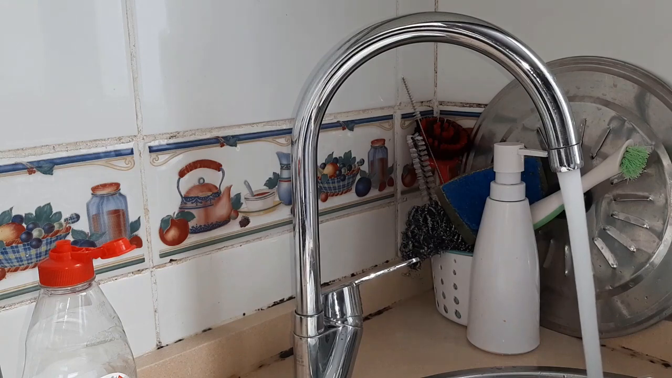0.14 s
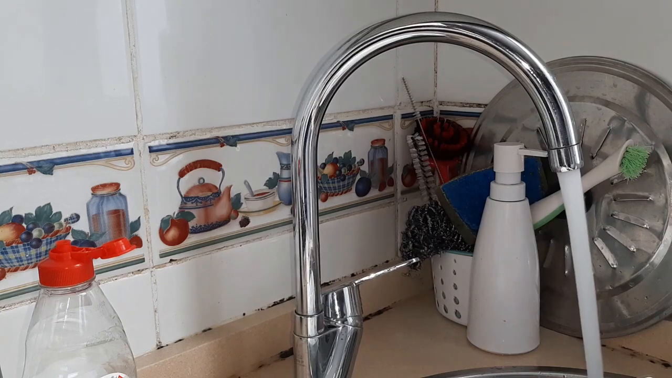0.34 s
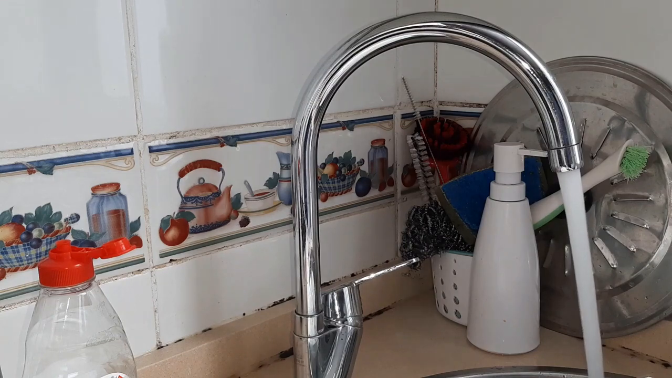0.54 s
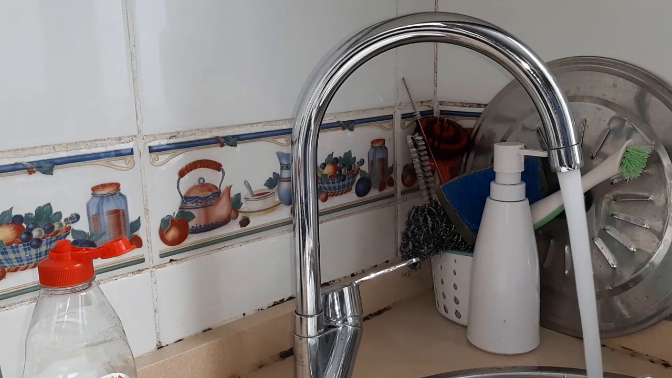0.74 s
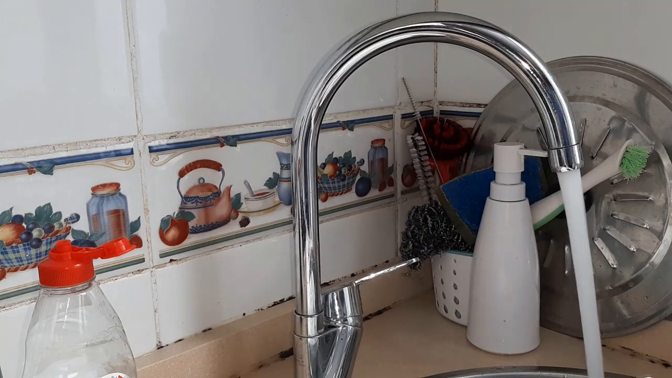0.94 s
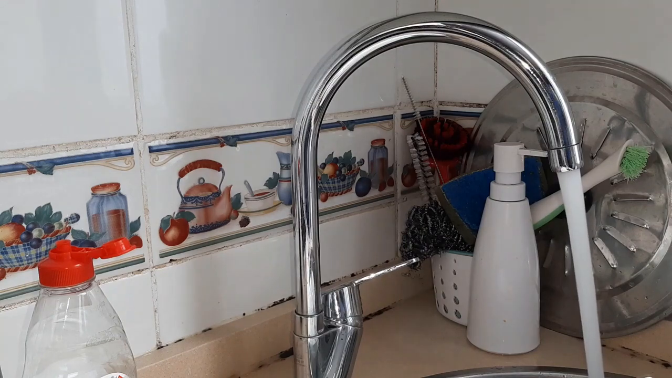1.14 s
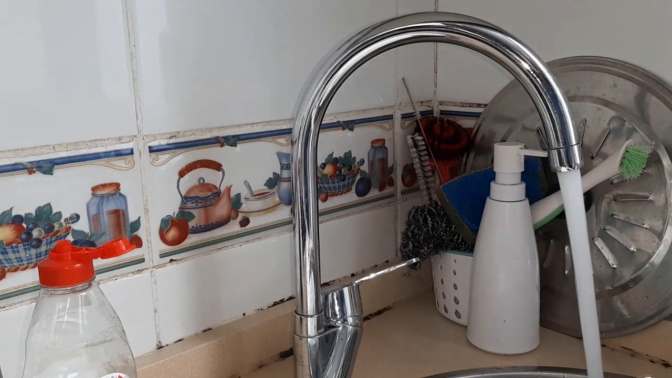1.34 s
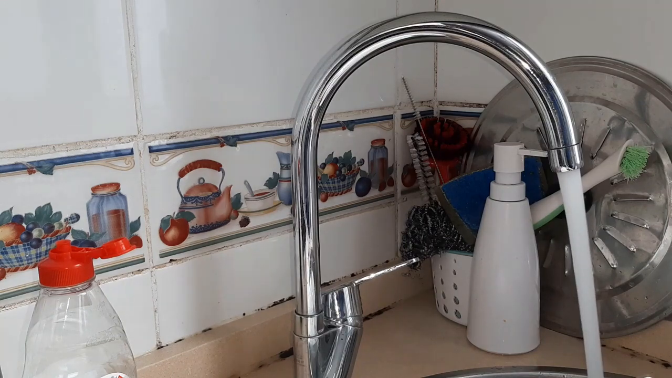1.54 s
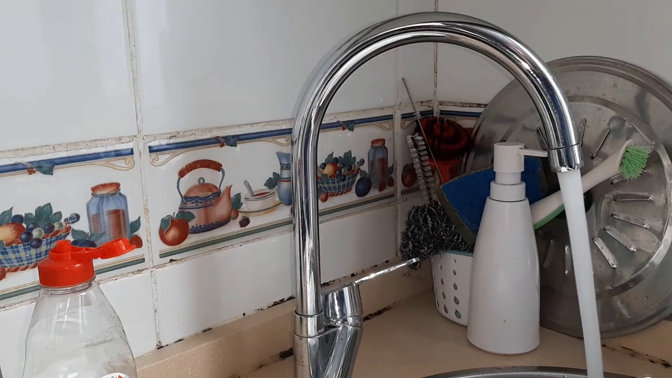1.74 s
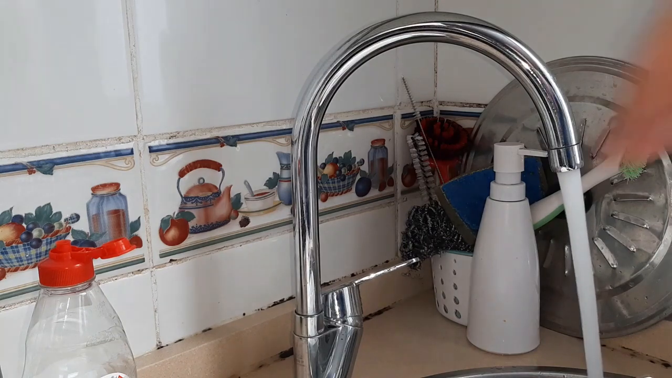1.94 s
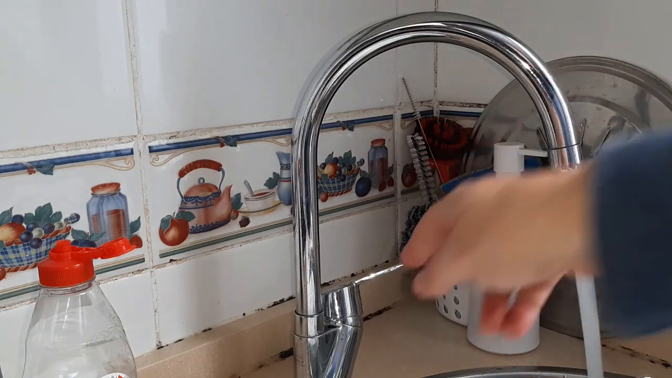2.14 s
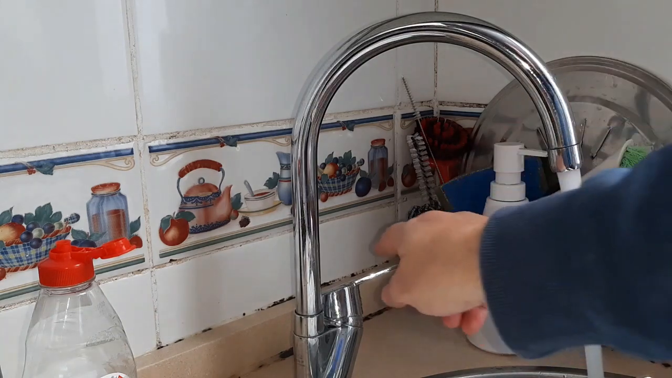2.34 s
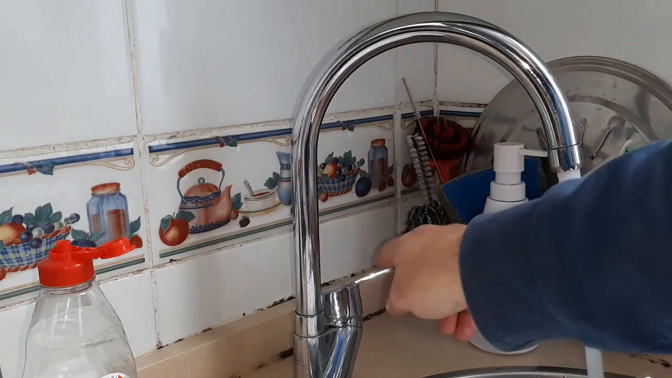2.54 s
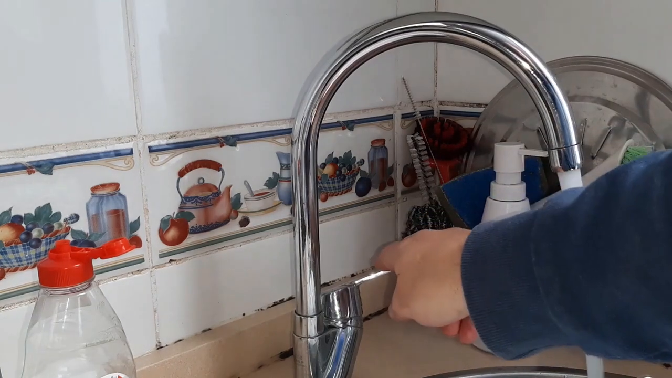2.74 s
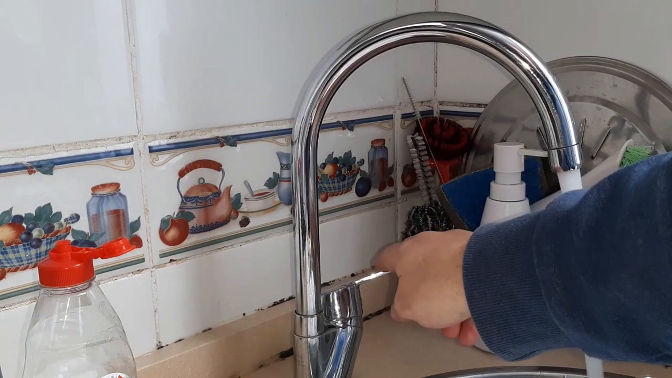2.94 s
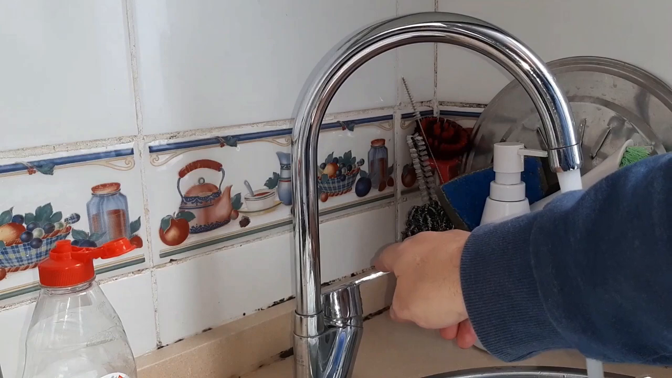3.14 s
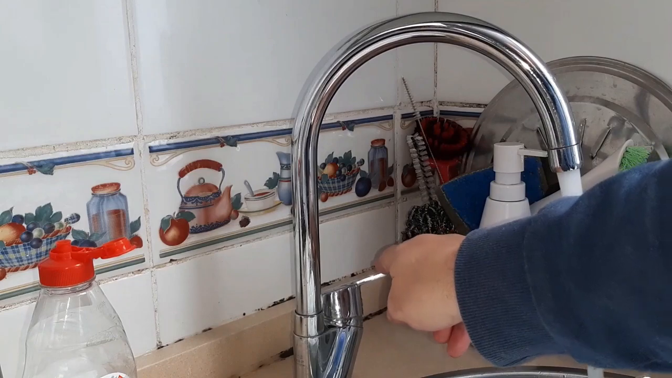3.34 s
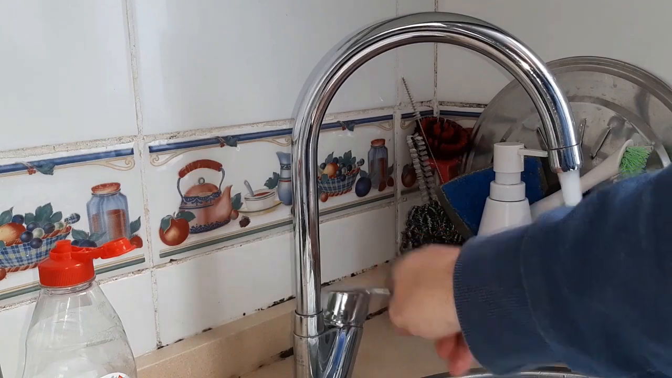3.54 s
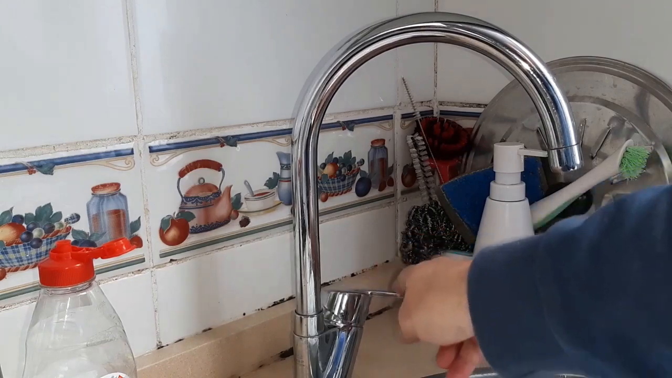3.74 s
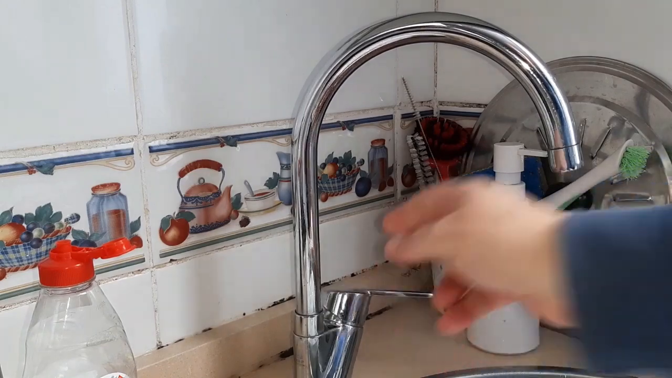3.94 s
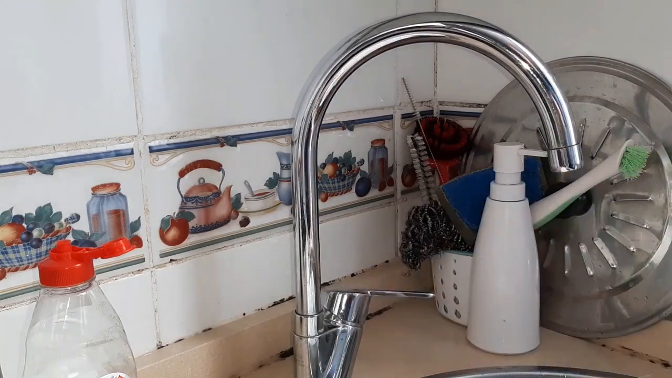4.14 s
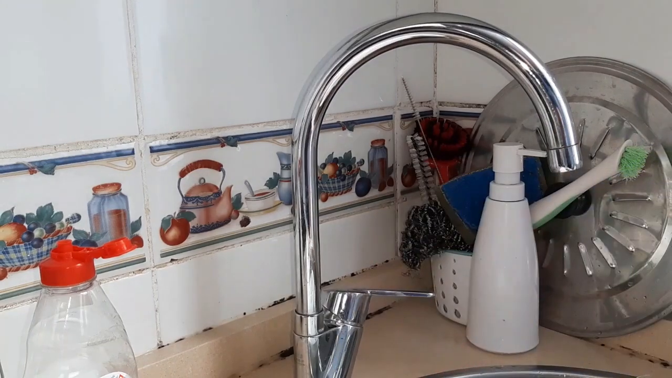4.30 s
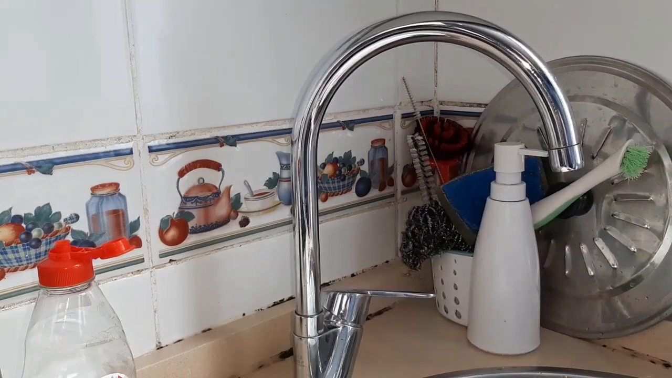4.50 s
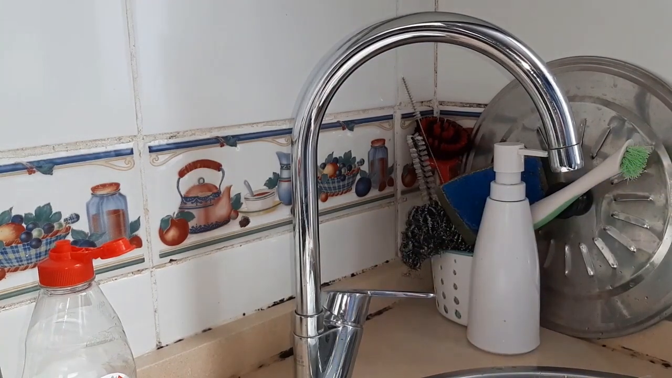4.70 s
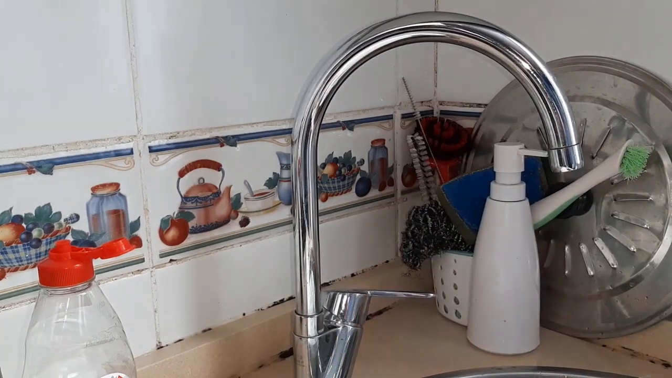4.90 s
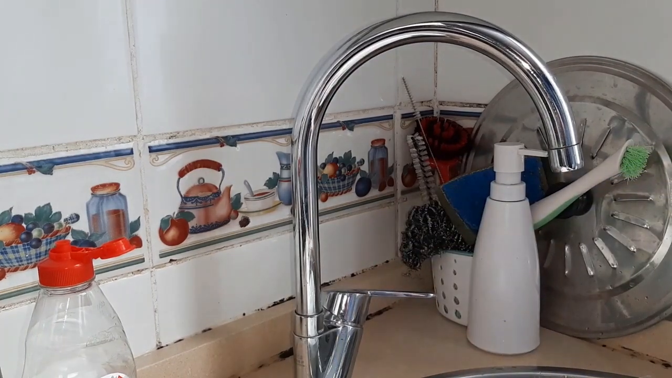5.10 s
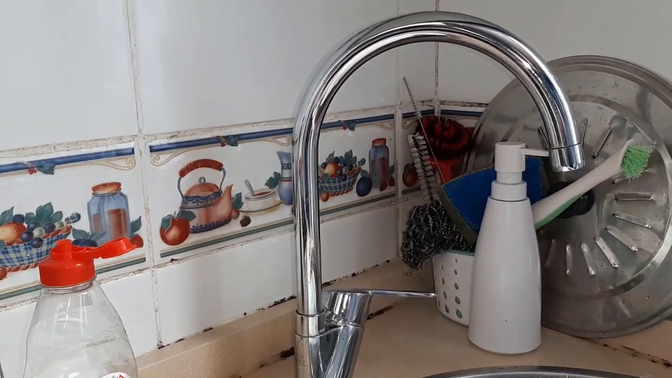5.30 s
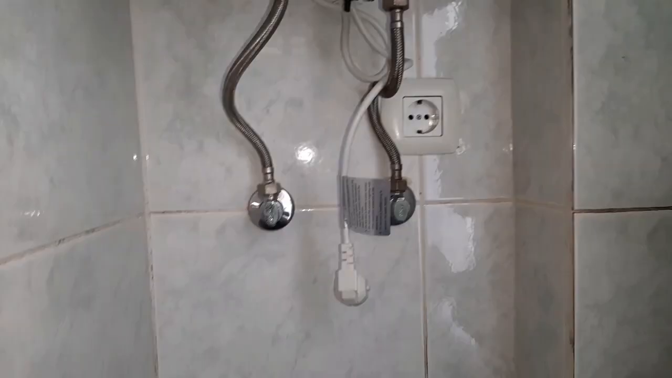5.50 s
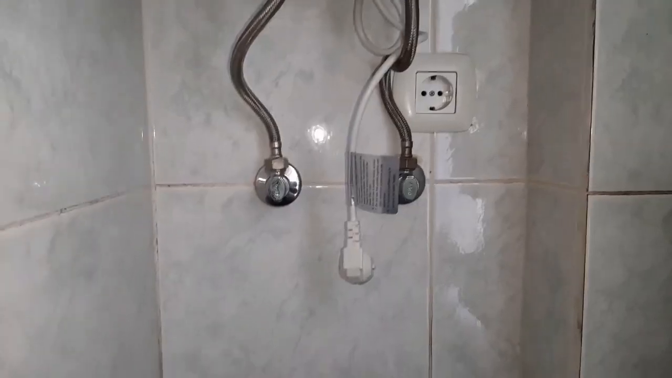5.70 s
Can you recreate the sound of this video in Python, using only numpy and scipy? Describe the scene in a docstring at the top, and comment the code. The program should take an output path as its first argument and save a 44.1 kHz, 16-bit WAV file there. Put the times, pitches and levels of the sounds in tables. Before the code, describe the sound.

A kitchen tap splashes and drums hard into a steel sink, shuts off with a dull thud, then the drain fizzes, gurgles and drips before a cut to near silence.

```python
"""Water from a kitchen tap drums on a steel sink and sprays, then the lever shuts it with a thud.
The spout empties and the drain fizzes, gurgles, drips and sings over a mains hum, with soft knocks.
The sound cuts to a short silence, then a quieter room fades in. Random impacts excite ringing modes of steel
and cabinet; spray, foam and air are coloured noise; drops and bubbles are short notes rising in pitch."""
import sys
import numpy as np
from scipy import signal
from scipy.fft import rfft, irfft
from scipy.io import wavfile
from scipy.ndimage import uniform_filter1d

SR = 44100
rng = np.random.default_rng(int(sys.argv[2]) if len(sys.argv) > 2 else 0)


def generate_wav(signal):
    """Clip the signal to [-1, 1] and save it as 16-bit WAV at the path in sys.argv[1]."""
    frames = np.transpose(np.atleast_2d(signal))
    scaled = np.clip(frames, -1, 1) * 32767
    pcm = np.round(scaled).astype(np.int16)
    wavfile.write(sys.argv[1], SR, pcm)


def boost(x):
    """Linear amplitude factor 10**(x/20) for a level x in decibels (scalar or array-like)."""
    u = np.asarray(x, float) / 20
    return 10 ** u


N = 254016
t = np.arange(N) / SR  # seconds

# Ringing modes of the steel basin. Each row: pitch in Hz, relative level in dB, t60 in seconds.
BASIN_MODES = [(344.7, -15, 0.06), (401.5, -8, 0.087), (438, -10, 0.051), (468, -3.5, 0.056),
               (526, -2.5, 0.075), (562, -3, 0.034), (664, -12, 0.03), (761, -7, 0.047), (820, -7.5, 0.033),
               (955, -17.5, 0.078), (1013, -9, 0.075), (1128, -12.5, 0.056), (1341, -12.5, 0.066),
               (1512, -11, 0.089), (1683, -11, 0.075), (1973, -9.5, 0.11), (2080, -12, 0.033),
               (2405, -8, 0.074)]
# Ringing modes of the cabinet. Each row: pitch in Hz, relative level in dB, t60 in seconds.
CABINET_MODES = [(75.4, -5.5, 0.26), (100.5, -2.5, 0.18), (130, -6.5, 0.052), (173.5, -7, 0.083),
                 (243.4, -8, 0.048), (301, -11, 0.14)]
# Heavy slugs of water that trap a pocket of air on the steel.
# Each row: start in seconds, level in dB, pitch in Hz, splash against the plop in dB.
SLUG_HITS = [(0.009, -30, 490, -24), (0.057, -26.5, 525, -0.5), (0.137, -35, 534, 6),
             (0.203, -23.5, 560, -7), (0.224, -27, 825, -13), (0.291, -26.5, 484, -20),
             (0.321, -29, 565, -4), (0.439, -34, 763, -2.5), (0.484, -29.5, 517, -2),
             (0.648, -34, 536, -14), (0.689, -35, 530, -13), (0.72, -25.5, 519, -16),
             (0.794, -27.5, 747, -15), (0.85, -30, 462, -13), (0.888, -35, 468, -1.5),
             (0.959, -26.5, 516, -11), (0.979, -33, 468, -12), (1.009, -30, 570, -13), (1.049, -35, 452, 0),
             (1.078, -29.5, 484, 0), (1.144, -29.5, 803, -7), (1.196, -33.5, 468, -1),
             (1.269, -31.5, 517, -11), (1.329, -26, 533, -14.5), (1.378, -32, 480, -13),
             (1.442, -36, 535, -7), (1.472, -29, 547, -0.5), (1.532, -29, 585, -18), (1.567, -26, 525, -8),
             (1.599, -32, 540, -2), (1.667, -28, 455, 1), (1.741, -29.5, 759, -4.5),
             (1.78, -28.5, 585, -9.5), (1.869, -35, 533, -12.5), (1.962, -28, 538, -8),
             (2.039, -36, 526, -6), (2.09, -26.5, 525, -2), (2.116, -41, 534, -6), (2.213, -32.5, 565, 2.5),
             (2.335, -43, 495, -1.5), (2.393, -29, 535, -10.5), (2.431, -25.5, 545, -9.5),
             (2.47, -29, 535, -14), (2.539, -30.5, 547, -21), (2.633, -32.5, 540, -7),
             (2.689, -27.5, 505, -8.5), (2.753, -24, 504, -17), (2.83, -29.5, 536, -5.5),
             (2.895, -29, 532, -3.5), (2.975, -27, 514, -13), (3.032, -30, 540, -4), (3.072, -33, 755, -2),
             (3.102, -28.5, 759, -7), (3.124, -25.5, 577, -17), (3.234, -25, 813, -9),
             (3.311, -23, 538, -25), (3.483, -32, 522, -23), (3.523, -22.5, 507, -14),
             (3.539, -26.5, 522, -13), (3.55, -28, 486, -17), (3.576, -33.5, 537, -15),
             (3.63, -23, 522, -10.5), (3.694, -23.5, 528, -3.5), (3.714, -26.5, 493, -7),
             (3.734, -30, 496, -11.5)]
# The jet swells for a moment and drums harder. Each row: crest in seconds, force in dB.
JET_SURGES = [(0.0, -37.5), (0.7, -55), (0.97, -46), (1.58, -42.5), (2.0, -37.5), (2.68, -42), (3.1, -41),
              (3.545, -38), (3.72, -40.5)]
# Colour of the spray. Each row: frequency in Hz, relative level in dB per Hz.
SPRAY_COLOUR = [(350, -2.5), (600, -4.5), (800, -0.5), (1170, -7.5), (1500, -3.5), (2800, -4), (5500, -3.5),
                (8900, -7.5), (12500, -3.5), (14500, -0.5), (17000, -2)]
# Echoes off the basin walls cancel the spray in places.
# Each row: centre in Hz, width in Hz, share removed (0 to 1).
ECHO_GAPS = [(1847, 82, 0.94), (3110, 330, 0.19), (4630, 830, 0.26), (6220, 170, 0.65), (9040, 1300, 0.31)]
# Last spurts from the spout. Each row: crest in seconds, level in dB.
SPOUT_SPURTS = [(3.68, -30), (3.712, -32), (3.8, -38.5), (3.895, -60)]
# Mains hum. Each row: pitch in Hz, level in dB rms midway between the sides.
MAINS_HUM = [(50, -72.5), (100.3, -58), (150, -81)]
# Colour of the kitchen's rumble and air. Each row: frequency in Hz, relative level in dB per Hz.
KITCHEN_COLOUR = [(15, -38), (28, -6), (50, -10), (100, -11), (130, -17), (185, -27), (285, -14),
                  (600, -46), (900, -39.5), (1350, -25.5), (2100, -31), (2900, -46.5), (8000, -30.5),
                  (16500, -63)]
# The lever stops the water column. Each row: start in seconds, peak in dB.
VALVE_THUD = [(3.614, -26.5)]
# Colour of the fizzing foam. Each row: frequency in Hz, relative level in dB per Hz.
FIZZ_COLOUR = [(1060, -72), (1800, -5), (2980, -7), (3540, -4), (5540, -2.5), (8910, -9.5), (12800, -3.5),
               (16000, -5)]
# Colour of the gurgling trap. Each row: frequency in Hz, relative level in dB per Hz.
GURGLE_COLOUR = [(200, -10), (350, -5.5), (700, -2), (1400, -2.5), (2100, -4.5), (3200, -6.5)]
# The trap gulps air and stirs the foam, before the drain's fade-in.
# Each row: crest in seconds, gurgle in dB, fizz in dB, build-up in seconds.
TRAP_GULPS = [(3.822, -37, -37, 0.012), (3.931, -55, -72, 0.023), (4.185, -52.5, -70, 0.0047),
              (4.225, -55, -55.5, .01), (4.39, -53, -52, 0.023), (4.415, -51, -61, .015),
              (4.435, -49.5, -53, 0.02), (4.455, -59, -57.5, .01), (4.49, -58, -62, .01),
              (4.545, -62, -70, .01), (4.655, -61, -64, .004), (4.71, -56, -62.5, 0.025),
              (4.895, -66, -62, .004), (5.064, -88, -58.5, 0.14), (5.346, -61, -65, 0.0065),
              (5.428, -82, -61, .01)]
# Drips and small splashes. Each row: start in seconds, peak in dB, pitch in Hz, left minus right in dB.
DRIP_HITS = [(3.8008, -41, 6800, 2), (3.8935, -35, 4000, 6), (3.8932, -38, 7000, 6), (4.057, -41, 3010, 2),
             (4.181, -51, 1100, 2), (4.2043, -45, 9140, 3), (4.356, -41, 2700, -3), (4.366, -43, 2500, -3),
             (4.3713, -36, 4140, -8), (4.376, -45, 5900, -6), (4.417, -50, 1500, 0), (4.432, -46, 950, 0),
             (4.4894, -45, 2190, -1.5), (4.645, -38, 3250, 5), (4.647, -42, 4900, 5), (4.65, -45, 2350, -1),
             (4.8915, -50, 4600, 0), (4.8965, -47, 2700, -1), (5.035, -42, 4020, 6), (5.05, -48, 3750, 6),
             (5.0968, -49, 6850, 8), (5.1194, -46, 3930, 1), (5.14, -51, 3800, 1), (5.3414, -50, 7620, -14),
             (5.42, -50, 4670, -5)]
# Soft knocks on something hollow.
# Each row: start in seconds, peak in dB, pitch in Hz, t60 in seconds, left minus right in dB.
KNOCK_HITS = [(4.18, -49, 382, .09, 2), (4.199, -56, 480, .08, 2), (4.208, -55, 150, .25, 2),
              (4.222, -60, 330, .1, 2), (4.252, -61, 300, .1, 2), (5.3412, -37, 262, .013, -26),
              (5.3487, -40, 280, .025, -26), (5.362, -56, 140, .15, -26), (5.365, -68, 420, .08, -26)]
# The last trickle singing in the waste pipe. Each row: crest in seconds, level in dB.
PIPE_TRICKLES = [(4.955, -57), (4.97, -59), (4.995, -62), (5.02, -59), (5.036, -58), (5.053, -61),
                 (5.07, -57), (5.085, -58), (5.103, -63), (5.183, -62), (5.195, -64)]
# A faint thin note that lingers. Each row: crest in seconds, level in dB.
FAINT_NOTES = [(5.325, -78), (5.37, -75), (5.45, -76)]
# Colour of the next room's air. Each row: frequency in Hz, relative level in dB per Hz.
NEXT_AIR_COLOUR = [(24, -51.5), (40, -14), (256, -22), (320, -12), (529, -13.5), (663, -24), (1180, -22),
                   (1300, -13.5), (1520, -24), (4340, -22.5), (16000, -39)]

EMPTY_S = 3.751  # the spout runs empty


def level(x, db):
    """Set the rms level in dB."""
    return x * boost(db) / np.sqrt(np.mean(x ** 2))


def after(s):
    """Seconds since a moment, zero before it."""
    return np.maximum(t - s, 0)


def walk(rate):
    """Random levels held 1 / rate s and slewed twice; spread near 1."""
    hold = int(SR / rate)
    steps = np.repeat(rng.standard_normal(N // hold + 1), hold)
    return 1.644 * uniform_filter1d(uniform_filter1d(steps, hold), hold)[:N]


def swell(events, rise_s, fall_s):
    """Gain that climbs to each (s, dB) and dies away exponentially after it; powers add."""
    rises = np.broadcast_to(rise_s, len(events))
    power = 0
    for (s, db), rise in zip(events, rises):
        time_constants = np.where(t < s, (s - t) / rise, (t - s) / fall_s)
        power = power + boost(2 * db) * np.exp(-2 * time_constants)
    return np.sqrt(power)


def droplets(rate, spread_db, channels=2):
    """Sparse clicks of either sign at a mean rate per second, some larger than the rest."""
    hit = rng.random((channels, N)) < rate / SR
    size_db = np.minimum(spread_db * rng.exponential(size=(channels, N)), 9)
    return hit * rng.standard_normal((channels, N)) * boost(size_db)


def hiss(spectrum, source, flicker_db, rate):
    """Colour a source in broad overlapping bands; each band flickers on its own."""
    hz = np.maximum(np.fft.rfftfreq(N, 1 / SR), 1)
    points = np.array(spectrum)
    colour_db = np.interp(np.log(hz), np.log(points[:, 0]), points[:, 1], left=-150)
    coloured = rfft(source) * boost(colour_db)
    band, out = np.log(hz / points[0, 0]), 0
    for k in range(int(np.log(points[-1, 0] / points[0, 0])) + 2):
        share = np.cos(np.pi / 2 * np.clip(band - k, -1, 1)) ** 2
        out = out + irfft(coloured * share, N) * boost(flicker_db * walk(rate))
    return level(out, 0)


def ring(modes, length_s=.4):
    """Impulse response of damped modes; neighbours move against each other."""
    s = np.arange(int(length_s * SR)) / SR
    out = 0
    for k, (hz, db, t60) in enumerate(modes):
        strength = (-1) ** k * boost(db) * np.sqrt(1 / t60)
        out = out + strength * np.sin(2 * np.pi * hz * s) * boost(-60 * s / t60)
    return out


def room(x):
    """Direct sound plus a tiled room's decaying tail, different at each ear."""
    t60_s, tail_db = 0.18, -6.5
    s = np.arange(int(.4 * SR)) / SR
    tail = rng.standard_normal((2, len(s))) * boost(-60 * s / t60_s) * (s > .002)
    tail = tail / np.sqrt(np.sum(tail ** 2, axis=1, keepdims=True))
    stereo = np.atleast_2d(x) * np.ones((2, 1))
    return x + boost(tail_db) * signal.fftconvolve(stereo, tail, axes=1)[:, :N]


def place(events, shape):
    """Put one sound per row at its time, peak and side."""
    out = np.zeros((2, N + SR))
    for s, db, hz, t60, pan_db in events:
        sound = shape(np.arange(int(.25 * SR)) / SR, hz, max(t60, .01))
        gain = boost(db + np.array([[.5], [-.5]]) * pan_db)
        start = int(s * SR)
        out[:, start:start + len(sound)] += sound / np.abs(sound).max() * gain
    return out[:, :N]


def whistle(hz, width_hz):
    """Noise inside one resonance whose centre may move."""
    sway = uniform_filter1d(rng.standard_normal((2, N)), size=int(SR / width_hz))
    phase = 2 * np.pi * np.cumsum(hz * np.ones(N)) / SR
    return level(sway[0] * np.sin(phase) + sway[1] * np.cos(phase), 0)


def basin(force):
    """The jet wanders over the steel, so each mode's share varies; water lying on it bends the pitch."""
    bend, share_wander_db = .008, 1.3  # bend is a share of each mode's pitch
    out = 0
    for k, (hz, db, t60) in enumerate(BASIN_MODES):
        turn = np.exp(2j * np.pi * np.cumsum(hz * (1 + bend * walk(9))) / SR)
        share_db = db + 1.5 * walk(60) + share_wander_db * walk(14)
        share = (-1) ** k * boost(share_db) / np.sqrt(t60)
        decay = boost(-60 / (t60 * SR))
        # a one-pole decay in the mode's turning frame is a resonator of moving pitch
        out = out + np.imag(turn * signal.lfilter([1], [1, -decay], force * share / turn))
    return out


def drumming():
    """Broken water strikes the basin in random beats and sets its steel modes ringing."""
    force_db, wander_db, fall_db_s = -44.5, .6, -170
    steel_db = -40  # sound of the basin per unit of force
    beats = droplets(1500, 3.44, channels=3) * boost(0.8 * walk(90))
    # both sides hear most beats alike, some on one side only
    force = level(uniform_filter1d(beats[:1] + 0.38 * beats[1:], size=12), 0)
    steady = boost(force_db + wander_db * walk(7.27))
    strength = np.hypot(steady, swell(JET_SURGES, .025, .035))  # rise and fall in seconds
    return boost(steel_db) * basin(force * strength * boost(fall_db_s * after(EMPTY_S)))


def slugs():
    """Each slug rings a rough, short air-pocket note and throws a brighter splash."""
    plop_t60_s, plop_rise_s, splash_t60_s = 0.078, 0.002, 0.075
    out, s = np.zeros((2, N)), np.arange(int(.1 * SR)) / SR
    bright = signal.butter(2, [750, 2300], "band", fs=SR, output="sos")
    for when, db, hz, splash_db in SLUG_HITS:
        chance = rng.standard_normal((3, len(s)))
        rough = 1 + 0.32 * uniform_filter1d(chance[0], size=200) * np.sqrt(200)
        plop = rough * np.sin(2 * np.pi * hz * s) * boost(-60 * s / plop_t60_s)
        splash = level(signal.sosfilt(bright, 0.58 * chance[1:] + chance[0]), splash_db)
        splash = splash * boost(-60 * s / splash_t60_s)
        start = int(when * SR)
        out[:, start:start + len(s)] += boost(db) * (plop + splash) * (1 - np.exp(-s / plop_rise_s))
    return out


def cabinet_boom():
    """The jet shakes the cabinet, whose low modes boom a little louder on the left."""
    boom_db, wander_db, fall_db_s = -44.5, 1.3, -100
    shakes = droplets(400, 3.3, channels=3)
    shakes = shakes[:1] + 0.64 * shakes[1:]
    boom = level(signal.fftconvolve(shakes, ring(CABINET_MODES)[None], axes=1)[:, :N], 0)
    boom = boom * boost(boom_db + wander_db * walk(10.12) + fall_db_s * after(EMPTY_S))
    return boom * boost(np.array([[1.5], [-1.5]]))


def bubbles(per_s, low_hz, high_hz, cycles):
    """Trapped air rings for a few cycles, rising in pitch, with random strength left and right."""
    out, when = np.zeros((2, N)), rng.random((2, N))
    pitches = np.geomspace(low_hz, high_hz, num=9)
    s = np.arange(int(.03 * SR)) / SR
    born = np.flatnonzero(when[0] < per_s / SR)
    kind = (when[1, born] * len(pitches)).astype(int)
    for k, hz in enumerate(pitches):
        starts = np.zeros((2, N))
        starts[:, born[kind == k]] = rng.standard_normal((2, np.sum(kind == k)))
        grain = np.sin(2 * np.pi * hz * s * (1 + 0.0191 * hz * s)) * np.exp(-s * hz / cycles)
        out += signal.oaconvolve(starts, grain[None], axes=1)[:, :N]
    return level(out, 0)


def spray():
    """Water scatters as flickering hiss and bubbles; closing the valve leaves a duller dribble and spurts."""
    full_db, bubbles_db = -29, -15.5  # the open jet; bubbles against the hiss
    arm_s, arm_db = 2.08, -1.5  # an arm reaches in and shades the spray
    lever_s, lever_db_s, shut_fall_s = 3.47, -14, 0.0046  # the lever starts to close, then shuts
    spout_db, spout_fall_db_s = -37, -110
    slow_water_hz = 8100  # slow water has less treble
    source = rng.standard_normal((2, N)) + 0.49 * level(droplets(2500, 3.7), 0)
    water = hiss(SPRAY_COLOUR, source * boost(0.1 * walk(12) + 0.5 * walk(60)), 0.52, 15)
    water = water + boost(bubbles_db) * bubbles(400, 902, 7010, 5.5)
    jet_on = boost(full_db + arm_db * (t > arm_s) + lever_db_s * after(lever_s))
    jet_on = jet_on * np.exp(-after(VALVE_THUD[0][0]) / shut_fall_s)
    spout = boost(spout_db + spout_fall_db_s * after(EMPTY_S))
    dribble = np.hypot(spout, swell(SPOUT_SPURTS, .012, .025))  # rise and fall in seconds
    dull = signal.lfilter(*signal.butter(1, slow_water_hz, fs=SR), water)
    water = water * jet_on + dull * dribble * (1 - jet_on / jet_on.max())
    for hz, width_hz, share in ECHO_GAPS:
        water = water - share * signal.lfilter(*signal.iirpeak(hz, hz / width_hz, fs=SR), water)
    return water


def kitchen():
    """Mains hum that wavers in level and phase, stronger on the left, over the room's rumble and air."""
    hum = 0
    for hz, db in MAINS_HUM:
        tone = np.sin(2 * np.pi * hz * t + 0.14 * walk(27.0))
        hum = hum + np.sqrt(2) * boost(db + 1.1 * walk(3.4)) * tone
    source = rng.standard_normal((2, N)) + .4 * rng.standard_normal(N)  # partly shared by both sides
    rumble = hiss(KITCHEN_COLOUR, source, 1.0, 6.9)
    return hum * boost(np.array([[3.], [-3.]])) + rumble * boost(-65.5)


def valve():
    """Water hammer: one blunt blow into the cabinet modes."""
    s, db = VALVE_THUD[0]
    thud = np.convolve(ring(CABINET_MODES), np.hanning(260))
    out = np.zeros(N)
    start = int(s * SR)
    out[start:start + len(thud)] = thud / np.abs(thud).max() * boost(db)
    return out


def foam():
    """Foam fizzes and the trap gurgles as flickering noise; gulps stir both, and drying quietens both."""
    drain_s, dry_s, gulp_fall_s = 3.79, 4.52, 0.028
    fizz_db, fizz_rise_db_s, fizz_dry_db_s = -55, 1.5, -16.5
    gurgle_db, gurgle_dry_db_s = -64.5, -19
    fade = np.minimum(after(drain_s) / 0.15, 1)
    gulps = np.array(TRAP_GULPS)
    build_up = gulps[:, -1]
    steady_fizz = boost(fizz_db + fizz_rise_db_s * after(drain_s) + fizz_dry_db_s * after(dry_s))
    steady_gurgle = boost(gurgle_db + gurgle_dry_db_s * after(dry_s))
    fizz_source = rng.standard_normal((2, N)) + .5 * level(droplets(1800, 8.5), 0)
    fizz = hiss(FIZZ_COLOUR, fizz_source, 1.5, 29)
    fizz = fizz * np.hypot(steady_fizz, swell(gulps[:, 0:3:2], build_up, gulp_fall_s))
    gurgle_source = rng.standard_normal((2, N)) + .7 * level(droplets(1500, 4, channels=1), 0)
    gurgle = hiss(GURGLE_COLOUR, gurgle_source, 2.2, 24)
    gurgle = gurgle * np.hypot(steady_gurgle, swell(gulps[:, :2], build_up, gulp_fall_s))
    return fade * (fizz + gurgle)


def drips():
    """Single drops ring as short rough bubbles of rising pitch inside a splash of band noise."""
    splash_t60_s, ring_t60_s, splash_db = .075, .025, -5

    def drop(s, hz, t60):
        rough = 1 + 0.5 * uniform_filter1d(rng.standard_normal(len(s)), size=40) * np.sqrt(40)
        bubble = rough * np.sin(2 * np.pi * hz * s * (1 + 1.0 * s))
        around = signal.butter(2, [hz / 1.25, min(hz * 1.5, 15000)], "band", fs=SR, output="sos")
        splash = signal.sosfilt(around, rng.standard_normal(len(s)))
        tail = boost(splash_db - 60 * s / t60) * splash / splash.std()
        return (bubble * boost(-60 * s / ring_t60_s) + tail) * np.minimum(s / 0.001, 1)
    return place([(s, db, hz, splash_t60_s, pan_db) for s, db, hz, pan_db in DRIP_HITS], drop)


def knocks():
    """A hollow body sounds one note and a weaker one an octave under it, with a soft onset."""
    def knock(s, hz, t60):
        body = np.sin(2 * np.pi * hz * s) + .6 * np.sin(2 * np.pi * .5 * hz * s)
        return body * boost(-60 * s / t60) * (1 - np.exp(-(s / .0045) ** 2))
    return place(KNOCK_HITS, knock)


def trickle():
    """The last trickle sings in the waste pipe, its note sagging to a rest; a faint thin note lingers."""
    pipe_s, start_hz, end_hz, sag_s, faint_hz = 4.975, 1920, 1500, .02, 2110
    note_hz = end_hz + (start_hz - end_hz) * np.exp(-after(pipe_s) / sag_s)
    song = whistle(note_hz, 220) + .5 * whistle(note_hz, 700)
    song = song * swell(PIPE_TRICKLES, .006, .012) * boost(1.5 * walk(70))
    return song + whistle(faint_hz, 140) * swell(FAINT_NOTES, .015, .04)


def next_room():
    """Faint air of another room fades in and goes on rising, stronger on the left."""
    start_s, fade_s, air_db, rise_db_s = 5.6, 0.016, -72, 52
    fade = np.minimum(after(start_s) / fade_s, 1) ** 2
    side_db = np.array([[2.5], [-2.5]])
    gain = fade * boost(side_db + air_db + rise_db_s * after(start_s + fade_s))
    source = rng.standard_normal((2, N)) + rng.standard_normal(N)
    return hiss(NEXT_AIR_COLOUR, source, 1.1, 37) * gain


def scene():
    """The kitchen until the cut, a brief remnant and silence, then the next room."""
    cut_s = 5.518
    remnant = boost(-46.0) * (t < cut_s + .03)
    before_cut = np.clip((cut_s - t) / 0.00099, remnant, 1)
    echoing = room(drumming() + slugs() + drips() + valve())
    near = cabinet_boom() + spray() + foam() + trickle() + knocks() + kitchen()
    return (echoing + near) * before_cut + next_room()


def band_limit(x):
    """A steep low-pass at the top of the band."""
    return signal.sosfilt(signal.butter(12, 15740, fs=SR, output="sos"), x)


def record(dry):
    """The left side hears everything 4 samples late; small capsules lose deep bass; the top is cut steeply."""
    late = np.array([np.roll(dry[0], shift=4), dry[1]])
    thin = signal.sosfilt(signal.butter(2, 45, "high", fs=SR, output="sos"), late)
    capped = signal.sosfilt(signal.ellip(14, .3, 80, 15740, fs=SR, output="sos"), thin)
    return band_limit(capped)


dry = scene()
out = record(dry)
generate_wav(out)
```